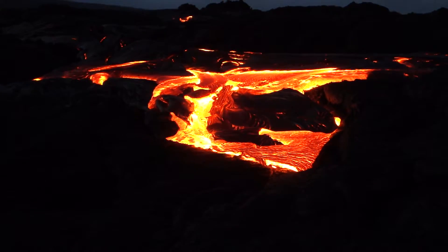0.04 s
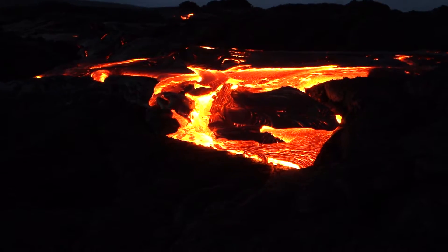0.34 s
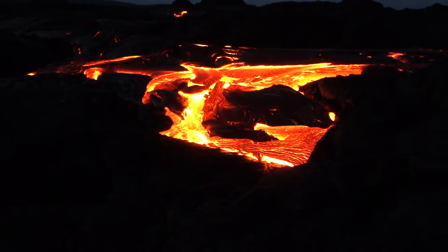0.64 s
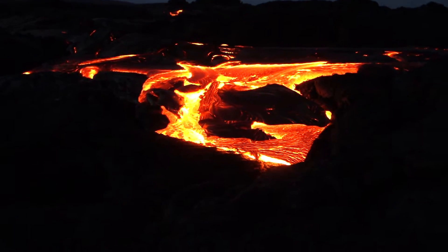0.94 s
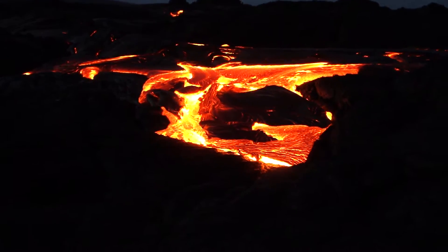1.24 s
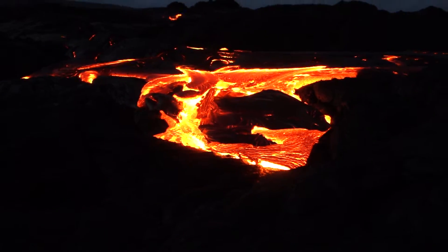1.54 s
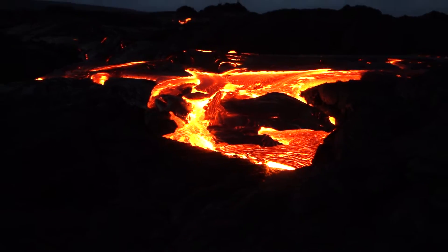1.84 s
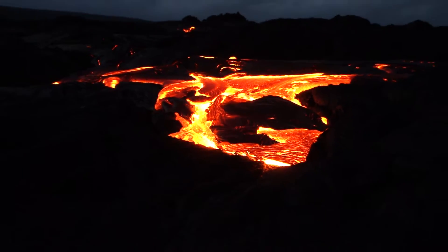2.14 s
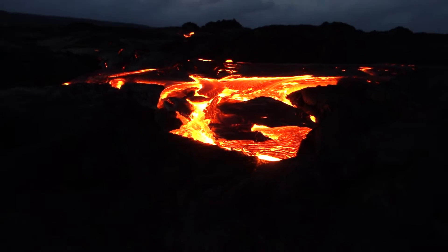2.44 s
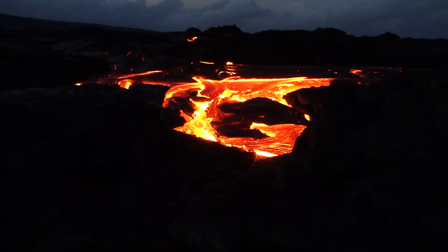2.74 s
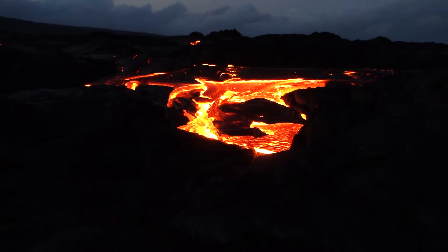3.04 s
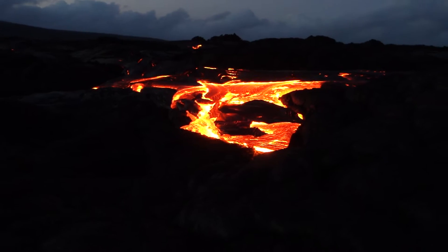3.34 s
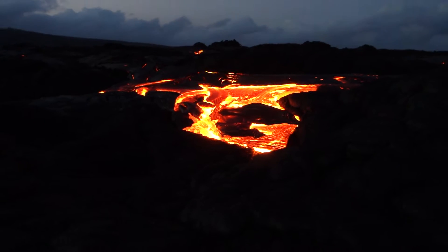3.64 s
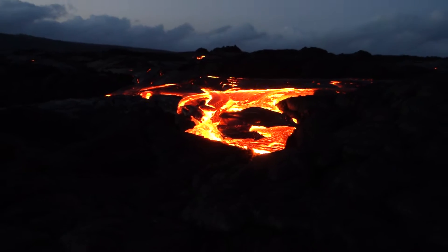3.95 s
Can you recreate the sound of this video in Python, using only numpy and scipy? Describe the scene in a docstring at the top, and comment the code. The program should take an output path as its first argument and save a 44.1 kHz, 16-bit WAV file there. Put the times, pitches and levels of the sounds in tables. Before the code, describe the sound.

Wind buffets the microphone from the start with a hollow, fluttering rumble and quick thumps, strongest from about 0.5 to 1.7 seconds, with a few brief hoots. It eases between 2.3 and 3 seconds, then builds again until 4 seconds. Cooling lava ticks and sizzles faintly throughout, with sharper snaps near 1.5 and 3.1 seconds. From 1.7 seconds a camera's zoom motor whirrs very softly.

```python
"""A fluttering, hollow rumble: gusts buffet a camera's two microphone ports beside a lava flow.
The wind brightens with force, with slaps of lone eddies and brief hoots of vortices falling into step.
Behind it the cooling crust ticks and crackles faintly over a thin sizzle; from 1.7 s the lens's zoom
motor whirrs softly. A fast limiter holds the gusts down and ducks the hiss with them."""
import sys
import numpy as np
from scipy import signal
from scipy.fft import rfft, irfft, next_fast_len
from scipy.io import wavfile
from scipy.ndimage import uniform_filter1d, minimum_filter1d, map_coordinates

SR = 44100
rng = np.random.default_rng(int(sys.argv[2]) if len(sys.argv) > 2 else 0)


def to_wav(s):
    """Save 16-bit WAV."""
    ch = np.atleast_2d(s).T  # columns
    pcm = np.round(np.clip(ch, -1, 1) * 32767)  # PCM
    wavfile.write(sys.argv[1], SR, pcm.astype(np.int16))


N = 176400


def amp(db):
    """Decibels to gain."""
    return 10 ** (np.asarray(db) / 20)


def unit(x):
    """Scale to rms 1."""
    return x / np.sqrt(np.mean(x ** 2) + 1e-20)


def along(points, hz):
    """Read (Hz, value) points on a log frequency axis."""
    f, v = np.transpose(points)
    return np.interp(np.log(hz + 1), np.log(f + 1), v)


def curve(rows):
    """(s, value) rows as one value per sample."""
    return np.interp(np.arange(N) / SR, *np.transpose(rows))


def wobble(hz):
    """A smooth random curve with hz knots a second."""
    return map_coordinates(rng.standard_normal(4096), [np.arange(N) * hz / SR], mode="mirror")


def filtered(x, response):
    """Filter x by a complex response of frequency."""
    m = next_fast_len(N + SR // 2)
    return irfft(rfft(x, m) * response(np.fft.rfftfreq(m, 1 / SR)), m)[..., :N]


def coloured(spectrum, drive=1):
    """Noise of a given colour and rms 1, its excitation scaled by drive."""
    return unit(filtered(drive * rng.standard_normal(N), lambda hz: amp(along(spectrum, hz))))


def pan(db):
    """Left and right gains of mean power 1, the left louder by db."""
    gains = amp(np.array([db, -db]) / 2)
    return gains / np.sqrt(np.mean(gains ** 2, axis=0))


# The lava's hiss, heard from beside the flow. Each row: time in seconds, level in dB.
SIZZLE_LEVEL = [(0, -69), (.15, -61), (.32, -64.5), (.5, -65), (.65, -72), (.9, -67), (1.1, -65),
                (1.3, -69.5), (1.5, -68), (1.65, -70.5), (2.0, -65), (2.9, -62), (3.27, -53.5), (3.42, -62),
                (3.6, -56.5), (3.78, -56.5), (3.9, -66.5), (4, -65)]
# Its colour. Each row: frequency in Hz, relative level in dB.
SIZZLE_SPECTRUM = [(300, 4), (2000, -1), (4000, 1.5), (5500, -0.5), (8000, -1), (11000, -0.5), (14000, -3),
                   (16000, 3.5)]

def sizzle():
    """The lava's fine, grainy hiss, unrelated at the two ports and a little to the right."""
    grains = [coloured(SIZZLE_SPECTRUM, drive=amp(3.5 * wobble(hz=294.6))) for _ in range(2)]
    level = amp(curve(SIZZLE_LEVEL) + .9 * wobble(hz=17))
    return level * pan(db=-1.5)[:, None] * grains


# The zoom motor, inside the camera with the microphones. Each row: time in seconds, level in dB.
MOTOR_LEVEL = [(1.66, -100), (1.72, -69.5), (1.95, -67.5), (2.5, -63.5), (3.1, -60), (3.8, -62), (3.9, -63),
               (4, -71)]
# Its whirr at the left and the right port. Each row: frequency in Hz, relative level in dB.
MOTOR_LEFT = [(300, 3), (1700, 5), (2300, 8.5), (2850, 20.5), (3300, -1), (3900, -7), (6000, -8), (7400, 7),
              (8800, -8), (10200, 5.5), (11200, -4.5), (12500, 14), (13500, 0.5), (14400, 10),
              (16000, -7.5)]
MOTOR_RIGHT = [(300, 0.5), (2400, 4), (3200, -16.5), (3800, 1.5), (6000, -4.5), (8000, -3.5), (9600, -2.5),
               (10500, -6.5), (11500, 2), (13000, 1), (16000, 5)]

def zoom_motor():
    """The lens draws back: a faint whirr through the camera's body."""
    return amp(curve(MOTOR_LEVEL)) * np.array([coloured(MOTOR_LEFT), coloured(MOTOR_RIGHT)])


# The colour of the tiniest cracks out on the flow. Each row: frequency in Hz, gain in dB.
CRACKLE_SPECTRUM = [(1000, -4), (2500, 3.5), (4000, -5), (7000, -10.5), (10000, -7), (16000, 1.5)]

def crust_crackle(per_second=280, spread_db=5, t60_s=0.00033):
    """Tiny cracks in the crust, scattered left and right, whose level follows the sizzle."""
    cracking = rng.random(N) < per_second / SR
    size = np.minimum(rng.exponential(size=N), 3)
    level = amp(curve(SIZZLE_LEVEL) + 5 + spread_db * size)
    impulses = cracking * level * pan(db=rng.normal(0, 6.6, N))
    t = np.arange(2048) / SR
    grain = rng.standard_normal(len(t)) * amp(-60 * t / t60_s)
    crackle = signal.fftconvolve(impulses, grain[None], axes=1)[:, :N]
    return filtered(crackle, lambda hz: amp(along(CRACKLE_SPECTRUM, hz)))


# Single cracks out on the cooling crust.
# Each row: start in seconds, peak in dB, pitch in Hz, left minus right in dB.
CRUST_SNAPS = [(.516, -49, 13100, -4.5), (0.567, -57.5, 2920, 10.5), (0.585, -56.5, 3500, 5),
               (.94, -49, 3670, -4.5), (.953, -53, 3330, 7), (1.069, -42.5, 3400, -6.5),
               (1.133, -46.5, 4000, -3), (1.215, -48, 4100, -1.5), (1.325, -46, 3400, 4),
               (1.363, -34.5, 13700, -16.5), (1.502, -31, 13540, -16), (1.501, -34, 7260, -11.5),
               (1.518, -39.5, 8960, -5.5), (1.659, -51, 3700, 6.5), (1.735, -40.5, 4980, 8),
               (1.735, -41.5, 11040, 17.5), (2.01, -50.5, 3270, 3), (2.21, -40.5, 10800, 2),
               (2.329, -49, 4300, 1), (2.428, -43, 5300, -1.5), (2.543, -49.5, 3400, 2),
               (2.81, -50.5, 5500, -1.5), (3.019, -43.5, 4470, 1), (3.062, -23.5, 6830, -15),
               (3.07, -33.5, 6260, -12.5), (3.078, -43, 3700, 1), (3.24, -39, 7550, 1),
               (3.289, -41, 5000, -10.5)]

def crust_snaps(snap_t60_s=0.0048, crumb_t60_s=.035, ring_db=15, ring_q=5.9):
    """The brittle crust snaps with a brief ring and a ragged, crumbling tail."""
    out, t = np.zeros((2, N + SR)), np.arange(2048) / SR
    f = np.fft.rfftfreq(len(t), 1 / SR)
    for start, db, hz, side_db in CRUST_SNAPS:
        damping = 1j * f * hz / ring_q
        ring = damping / (hz ** 2 - f ** 2 + damping)
        band = (1j * f / (hz / 2 + 1j * f)) ** 4 / (1 + 1j * f / (2 * hz))
        ragged_db = 5.5 * signal.resample(rng.standard_normal(48), len(t))
        crumbs = amp(-23.5 - 60 * t / crumb_t60_s + ragged_db)
        burst = rng.standard_normal(len(t)) * (amp(-60 * t / snap_t60_s) + crumbs)
        snap = irfft(rfft(burst) * band * (1 + amp(ring_db) * ring))
        snap = amp(db) * snap / np.abs(snap).max()
        out[:, round(start * SR):][:, :len(t)] += np.outer(pan(side_db), snap)
    return out[:, :N]


# Wind from one side across the microphone pair. Each row: frequency in Hz, lag of the left in radians.
LEFT_LAG = [(20, .05), (100, .3), (300, .82), (600, 1.42), (1000, 1.7), (2500, 1.75), (5000, 0)]
# The pair's balance in that wind. Each row: frequency in Hz, left minus right in dB.
LEFT_EXCESS = [(100, 0), (400, 1), (650, 4.5), (950, 12), (1300, 9.5), (1750, 3), (2600, 12.5), (4000, 5)]

def ports(x, side=1):
    """Pressure from one side (1) reaches the left port later and stronger; from the other, the right."""
    def response(hz):
        phase = .5 * side * np.outer([-1, 1], along(LEFT_LAG, hz))
        return pan(side * along(LEFT_EXCESS, hz)) * np.exp(1j * phase)
    return filtered(x, response)


# Hollow notes right at the ports. Each row: middle in seconds, half-length in seconds,
# level in dB, pitch at the middle in Hz, glide in Hz per second.
PORT_HOOTS = [(.575, 0.024, -18.5, 443, 298), (.77, 0.045, -27.5, 730, 3), (1.047, 0.02, -20.5, 462, 1500),
              (1.126, 0.03, -19.5, 563, 598), (1.24, 0.1, -28, 376.5, -1500),
              (1.34, 0.055, -23, 566, -1600), (1.66, .06, -23, 209, -500)]

def hoots(drift=.04):
    """For a moment the vortices fall into step and sound an unsteady, gliding note."""
    t, out = np.arange(N) / SR, np.zeros(N)
    for middle, half_length, db, hz, glide in PORT_HOOTS:
        swell = np.cos(np.pi / 2 * np.clip((t - middle) / half_length, -1, 1)) ** 2
        pitch = (hz + glide * (t - middle)) * (1 + drift * wobble(hz=153.3))
        out += amp(db) * swell * np.sqrt(2) * np.sin(2 * np.pi * np.cumsum(pitch) / SR)
    return ports(out)


# Lone eddies striking the microphones. Each row: time in seconds, level in dB, pitch in Hz,
# side (positive is left, negative is right).
EDDY_SLAPS = [(0.036, -8, 446, 1), (.1, -5.5, 610, 1), (.118, -10.5, 487, 0.85), (.188, -11, 537, 0.64),
              (.194, -14.5, 926, 1), (.215, -17, 492, 0.71), (.256, -12, 482, 0.98),
              (0.303, -11, 424, 0.85), (.35, -5.5, 599, 0.99), (.367, -8.5, 610, 0.95),
              (.384, -11, 480, 0.78), (.405, -12, 520, 0.9), (0.506, -8, 558, 0.94), (0.525, -4.5, 592, 1),
              (.682, -8.5, 908, 1), (.756, -0.5, 685, 0.7), (.831, -13.5, 712, 0.73), (.885, -13, 406, 1),
              (0.916, -11.5, 436, 0.87), (.953, -11.5, 1350, .8), (0.997, -13, 400, 0.98),
              (1.044, -5.5, 460, -.4), (1.074, 1, 617, -0.85), (1.226, -13.5, 377, 0.7),
              (1.259, -14, 151, 0.96), (1.32, -1.5, 600, 1), (1.454, -12, 589, 0.83), (1.517, -7, 468, 1),
              (1.553, -8.5, 521, 0.9), (1.623, -16, 1430, 0.89), (1.847, -16.5, 530, 0.82),
              (1.931, -17.5, 432, 0.89), (1.959, -14, 320, -.8), (2.008, -14, 380, 0.45),
              (2.11, -6.5, 463, 0.47), (2.208, -14, 331, -0.82), (2.262, -17.5, 390, 0.78),
              (2.329, -29.5, 1220, .11), (2.403, -18.5, 450, -.3), (2.724, -16, 356, -1.2),
              (2.743, -10, 389, -1.1), (3.007, -16.5, 442, 1), (3.126, -13, 420, 0.89),
              (3.155, -11.5, 470, 1), (3.202, -18.5, 392, 0.93), (3.228, -16, 484, 1),
              (3.265, -18.5, 470, 0.81), (3.295, -14.5, 653, 0.63), (3.466, -15.5, 378, 0.73),
              (3.733, -12.5, 547, 1), (3.798, -11, 577, 1)]

def slaps(rise_cycles=0.15, ring_cycles=0.82):
    """Each lone eddy is a quick push of pressure that swings a few times in the port."""
    t, out = np.arange(N) / SR, np.zeros((2, N))
    for time, db, hz, side in EDDY_SLAPS:
        cycles = (t - time) * hz
        swell = np.exp(-np.logaddexp(-cycles / rise_cycles, cycles / ring_cycles))
        out += ports(amp(db) * swell * np.sin(2 * np.pi * cycles), side)
    return out


# Air passing the camera between puffs. Each row: time in seconds, relative level in dB.
AIRFLOW = [(0, -23), (.12, -35), (.15, -35), (.25, -37), (.3, -29), (.43, -32), (.6, -27), (.85, -31.5),
           (.9, -38.5), (.97, -27), (1.4, -24.5), (1.54, -29), (1.7, -31), (1.82, -31.5), (2.1, -33),
           (2.24, -42), (2.5, -41), (2.62, -48), (2.85, -50), (2.94, -57.5), (3.02, -46), (3.2, -43.5),
           (3.4, -31.5), (3.64, -29), (3.69, -52.5), (3.73, -32), (3.85, -29), (4, -24)]
# Puffs hitting the ports. Each row: start in seconds, length in seconds,
# relative levels of the body and of the bright part in dB.
PORT_PUFFS = [(0.018, 0.0556, -26, -36), (.181, 0.01602, -20.5, -34), (0.355, 0.02385, -24, -34.5),
              (0.46, 0.03862, -22, -32.5), (0.531, 0.07126, -23, -29.5), (0.606, 0.0659, -24, -27),
              (0.684, 0.01705, -21.5, -29.5), (0.71, 0.011, -24, -28), (0.745, 0.01852, -21.5, -33),
              (0.769, 0.029, -24.5, -36.5), (0.823, 0.0084, -20.5, -38), (0.933, 0.024, -23.5, -27.5),
              (0.964, 0.011, -26.5, -33), (1.014, 0.04117, -23.5, -38.5), (1.059, .016, -24.5, -23.5),
              (1.101, 0.0498, -25.5, -33.5), (1.154, 0.0371, -23.5, -14), (1.211, 0.0309, -22, -39),
              (1.254, 0.0508, -21, -29.5), (1.318, 0.014, -25.5, -18), (1.339, 0.03, -26, -20.5),
              (1.382, 0.017, -28.5, -38), (1.452, 0.026, -24.5, -32), (1.483, 0.04205, -22.5, -26),
              (1.553, .143, -21, -33), (1.705, 0.02913, -25.5, -42), (1.74, 0.04837, -22.5, -41),
              (1.867, 0.01543, -22, -49), (1.892, .025, -25.5, -53), (2.027, 0.0523, -28, -52),
              (2.105, 0.0316, -21.5, -40), (2.139, 0.0402, -25, -38), (2.38, 0.0362, -29, -50),
              (2.506, 0.03223, -30.5, -63), (2.585, 0.0445, -39, -69), (2.657, 0.0155, -32.5, -72),
              (2.722, 0.02613, -32, -57), (2.783, 0.0446, -35.5, -80), (2.856, 0.0288, -40, -75),
              (2.973, 0.014, -40, -73.5), (3.028, .034, -27, -52.5), (3.094, 0.05014, -28.5, -62),
              (3.226, .019, -29, -40.5), (3.299, 0.0422, -25.5, -33.5), (3.344, 0.068, -24, -39),
              (3.472, 0.1367, -28.5, -42.5), (3.704, 0.012, -29.5, -54), (3.757, 0.015, -24.5, -37.5),
              (3.794, .083, -26, -35.5), (3.882, 0.054, -29, -33), (3.923, 0.041, -31.5, -30.5)]

def puff_levels(edge_s=0.0067, flow_bright_db=-18.5):
    """Gains of the wind's body and bright part: each puff rises out of the airflow, holds and drops."""
    t, flow_db = np.arange(N) / SR, curve(AIRFLOW)
    power = amp([flow_db, flow_db + flow_bright_db]) ** 2
    for start, length, body_db, bright_db in PORT_PUFFS:
        inside_s = np.minimum(t - start, start + length - t)
        gate = np.sin(np.pi / 2 * np.clip(inside_s / edge_s + .5, 0, 1)) ** 2
        power += np.outer(amp([body_db, bright_db]), gate) ** 2
    return np.sqrt(power)


def shedding(force, veer, pitch_hz=450.7, pitch_at_db=-22, wander_octaves=.26, width_hz=90):
    """Vortices shed at the ports: a narrow, wandering resonance that climbs as the puff grows."""
    wander = 2 ** (wander_octaves * wobble(hz=21.9))
    hz = pitch_hz * (force / amp(pitch_at_db)) ** .17 * wander
    phase = 2 * np.pi * np.cumsum(hz) / SR
    near, far = [force * unit(wobble(width_hz) * np.cos(phase) + wobble(width_hz) * np.sin(phase))
                 for _ in range(2)]
    return amp(-8) * (ports(np.sqrt(1 - veer) * near) + ports(np.sqrt(veer) * far, side=-1.8))


def turbulence(spectrum, veer, flutter, steady_s):
    """Bursts of eddies from both sides, their level evened out over about steady_s."""
    near = ports(coloured(spectrum, flutter))
    far = ports(coloured(spectrum, flutter), side=-1.06)
    eddies = np.sqrt(1 - veer) * near + np.sqrt(veer) * far
    width = int(steady_s * SR)
    power = uniform_filter1d(np.mean(eddies ** 2, axis=0), width)
    power = uniform_filter1d(power, width // 2)
    return eddies / np.sqrt(np.abs(power) + 1e-9)


# Four colours of wind right on the microphones, from the largest eddies to the smallest.
# Each row: frequency in Hz, relative level in dB.
RUMBLE_SPECTRUM = [(20, -21.5), (40, -36.5), (70, -11.5), (130, -0.5), (220, 1), (400, -18), (900, -48.5),
                   (2000, -90.5)]
THUD_SPECTRUM = [(40, -40), (100, -14.5), (170, -3.5), (250, -1), (340, -1), (500, -17), (1000, -52),
                 (2000, -96)]
BODY_SPECTRUM = [(30, -47.5), (90, -32.5), (160, -11.5), (280, 0.5), (450, 1), (650, -5.5), (900, -20),
                 (1300, -39.5), (2000, -70.5), (4000, -90)]
EDGE_SPECTRUM = [(150, -56.5), (400, 0.5), (700, 7), (1000, 1), (1300, -5.5), (1600, -18.5), (2100, -26),
                 (3000, -48.5), (4500, -58.5), (9000, -87)]
# The deep rumble at the ports. Each row: time in seconds, relative level in dB.
RUMBLE_LEVEL = [(0.0, -34), (0.21, -43.5), (0.49, -35.5), (0.83, -66), (0.96, -35.5), (1.19, -61),
                (1.26, -32), (1.35, -61), (1.39, -40), (2.33, -44), (2.38, -35.5), (2.61, -44.5),
                (2.88, -40), (2.92, -55.5), (3.02, -42.5), (4.0, -64)]
# Wind veering round the camera. Each row: time in seconds, share of power from the far side (0 to 1).
FAR_SIDE_SHARE = [(0, .04), (1.6, .04), (2.0, .1), (2.3, .5), (3.1, .45), (3.3, .01), (4, .01)]

def wind(flutter_db=4, spike_db=5.5):
    """Large eddies rumble and thud, middle ones flutter, small ones spit in the hardest puffs."""
    force, bright = puff_levels()
    veer = curve(FAR_SIDE_SHARE)
    flutter = amp(flutter_db * wobble(hz=170.84))  # eddies passing the ports
    spikes = amp(spike_db * wobble(hz=419.5))  # the smallest eddies
    rumble = amp(2.5 + curve(RUMBLE_LEVEL)) * turbulence(RUMBLE_SPECTRUM, veer, 1, steady_s=0.021)
    # The thud grows more slowly with the puffs than the body does.
    thud = amp(-15) * force ** 0.7 * turbulence(THUD_SPECTRUM, veer, flutter, steady_s=0.031)
    body = amp(-1.5) * force * turbulence(BODY_SPECTRUM, veer, flutter, steady_s=0.029)
    edge = amp(7) * bright * turbulence(EDGE_SPECTRUM, veer, flutter * spikes, steady_s=0.021)
    return rumble + thud + body + edge + shedding(force, veer)


def scene():
    """Wind on the ports over the sounds of the lava and the lens."""
    return wind() + slaps() + hoots() + sizzle() + crust_snaps() + crust_crackle() + zoom_motor()


def record(dry):
    """The camera's fast limiter, driven by the mean of both ports, then its band limit."""
    ceiling_db, hold_s, top_hz = -12.8, .008, 15850
    needed = np.minimum(1, amp(ceiling_db) / (np.abs(dry.mean(axis=0)) + 1e-9))
    hold = int(hold_s * SR)
    gain = minimum_filter1d(needed, hold)
    for _ in range(2):
        gain = uniform_filter1d(gain, hold // 2)
    return filtered(dry * gain, lambda hz: hz < top_hz)


dry = scene()
out = record(dry)
to_wav(out)
```